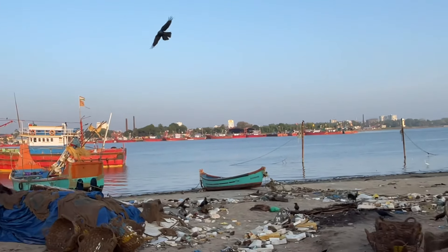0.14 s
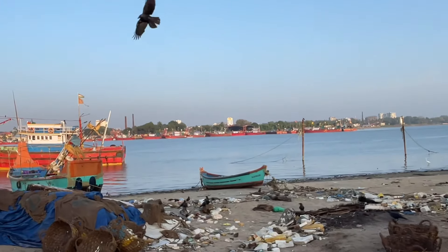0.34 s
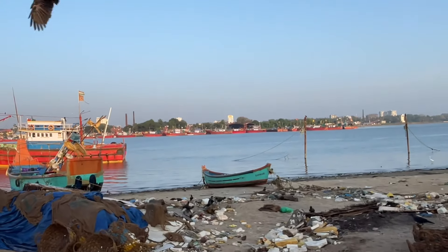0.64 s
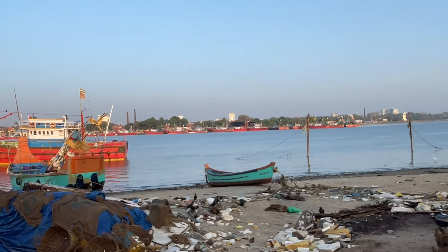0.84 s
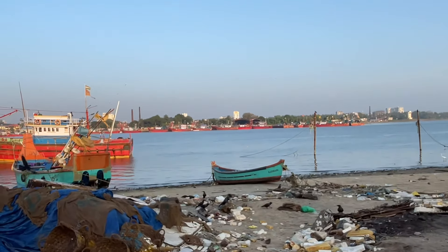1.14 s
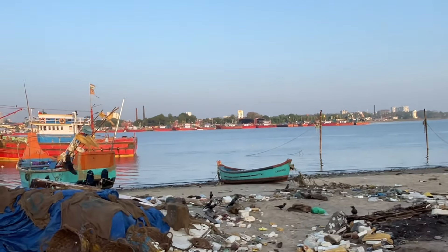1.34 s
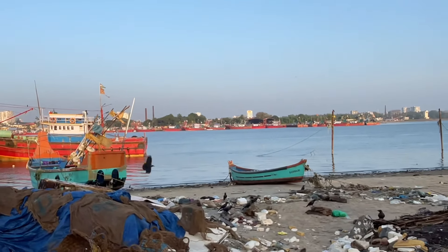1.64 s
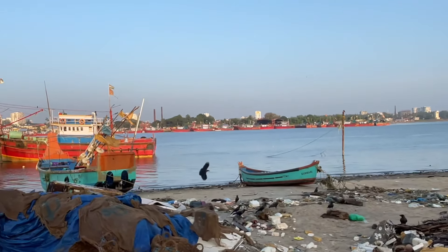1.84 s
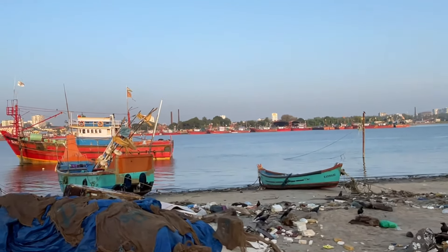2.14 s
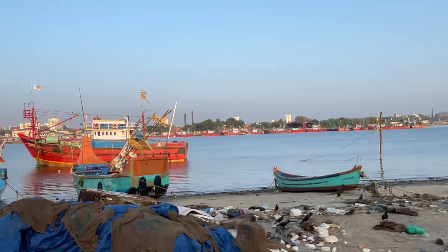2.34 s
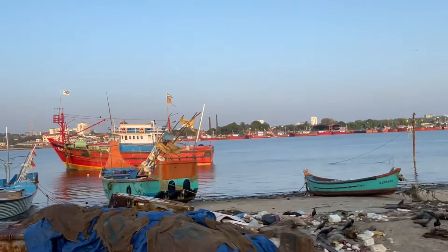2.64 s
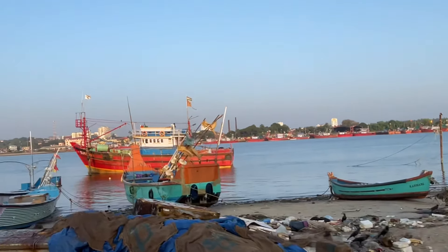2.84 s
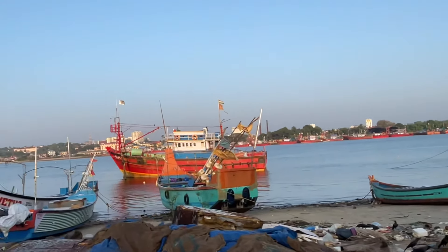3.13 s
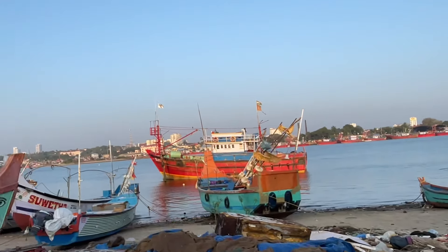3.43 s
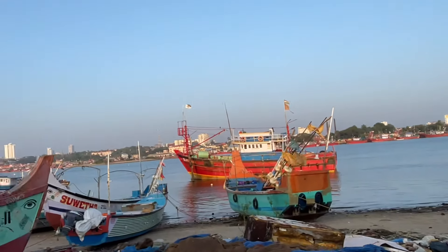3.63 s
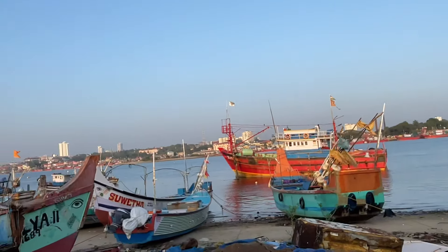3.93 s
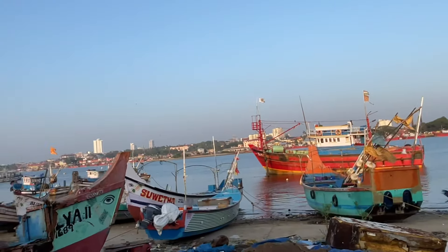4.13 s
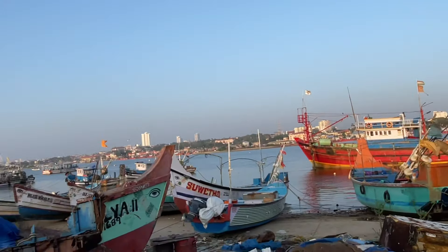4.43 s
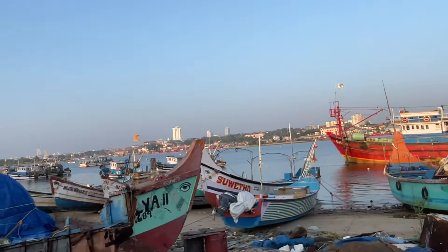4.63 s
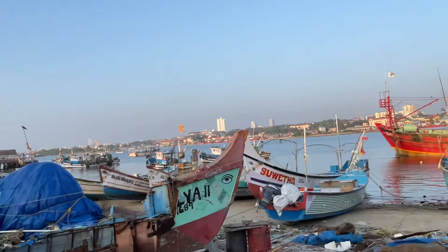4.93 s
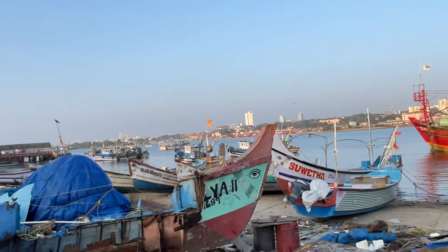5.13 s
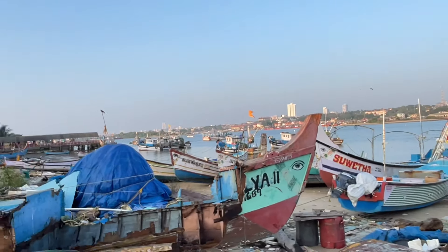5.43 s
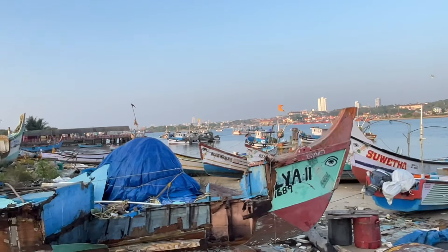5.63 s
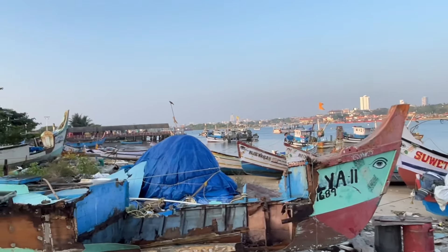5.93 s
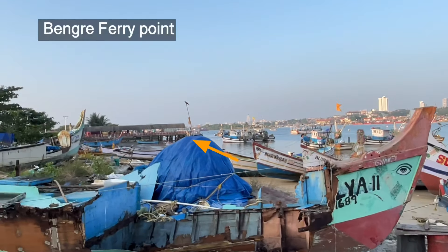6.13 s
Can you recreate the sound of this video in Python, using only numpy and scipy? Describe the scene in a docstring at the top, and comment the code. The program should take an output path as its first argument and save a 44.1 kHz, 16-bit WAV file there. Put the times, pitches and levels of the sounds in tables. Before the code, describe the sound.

Outdoors on a harbour beach, a handheld stereo microphone hears crows at varied distances. One caw is already under way at 0 s; others follow at about 0.15, 0.4, 0.55, 1.0, 1.2 and 1.6 s, raspy, fluttering, arching in pitch, some overlapping. From 1.9 to 2.4 s come a faint call, a deeper one and a strong near one. An idling boat engine wavers low throughout, with a faint motor hum and a low thump and knock around 2.7-2.8 s as breeze buffets the microphone. The loudest caws fall around 2.9 and 3.2 s, then a brighter one at 3.5, a short rough one at 3.8, and two overlapping at 4.2-4.4. Light knocks and ticks come near 4.7 s, with more breeze. A last higher, distant caw sounds at 5.0 s. Murmur and watery wash continue with a thin rattle, a tiny falling bird whistle at 5.85 and a tick at 6.05, until about 6.3 s.

```python
"""Crows caw, often overlapping, on a harbour beach, at several distances and bearings from a hand-held
camera that pans. Each caw is a train of fluttering syrinx pulses and breath, rung by a throat and scattered
by hulls and sand. Across the water a boat engine idles as wavering low tones, with low thumps near 2.7 s;
shaped noise makes the harbour's murmur and far wash, a thin rattle and the breeze buffeting the microphone.
Damped rings knock and tick nearby. Late on, a small bird whistles far off."""
import sys
import numpy as np
from scipy import signal
from scipy.fft import rfft, irfft, next_fast_len
from scipy.io import wavfile
from scipy.ndimage import uniform_filter1d, map_coordinates

SR = 44100
rng = np.random.default_rng(int(sys.argv[2]) if len(sys.argv) > 2 else 0)


def output_pcm(signal):
    """Save a mono or channel-first signal as 16-bit PCM at the path in sys.argv[1].

    Samples are clipped to [-1, 1] before scaling.
    """
    pcm = np.clip(np.atleast_2d(signal).T, -1, 1) * 32767
    wavfile.write(sys.argv[1], SR, np.round(pcm).astype(np.int16))


N = 276507

# One row per caw: (start [s], length [s], start to pitch crest [s], crest pitch [Hz],
# pitch bend [share/s^2], mid-call level at the crest pitch [dB], growth over the call [dB],
# treble over throat sound [dB], open-beak throat [Hz], open-beak upper throat [Hz], left lag [ms],
# left over right [dB], the same for the treble [dB], treble scatter [dB], bird [name])
CAW_CALLS = [ (-.19, 0.31, 0.14, 514, 8.3, -36.5, 4, -15, 2150, 4200, -0.045, -0.5, 0.5, -12, "near"),
             (0.151, 0.36, 0.2, 559.6, 8.7, -38.5, -1, -11.5, 2160, 4670, -0.06, -0.3, 3, -4, "shrill"),
             (0.38, 0.42, 0.23, 475.7, 3.07, -45, 10, -13, 1610, 4500, -0.048, 1, 2, -2.5, "faint"),
             (0.552, 0.32, .15, 515, 9.3, -38, 4.5, -15, 2090, 4300, -0.067, 0, 2, -9, "near"),
             (1.001, 0.35, 0.18, 488.6, 4.3, -45, 5.5, -10.5, 1610, 4060, .001, 2.5, 0, -6, "faint"),
             (1.171, .37, 0.19, 505, 5.85, -35.5, 5, -17, 2035, 4400, -.01, 2, 1, -7, "near"),
             (1.602, 0.31, 0.2, 484.6, 4.25, -39.5, 4, -13.5, 1844, 4250, 0.067, -1.5, 4.5, -13, "hoarse"),
             (1.922, 0.34, 0.11, 397.3, 1.11, -52, 25, -12, 1800, 5350, 0.096, 0.5, 2, 4, "faint"),
             (2.077, 0.42, 0.21, 442.3, 4.67, -38, 0.5, -14.5, 1780, 4400, .001, -1, .6, -15, "deep"),
             (2.397, 0.32, 0.14, 498.6, 7.7, -33.5, 1, -14, 1900, 4380, .001, -1, -0.5, -36, "near"),
             (2.925, 0.39, 0.2, 467.3, 6.5, -34, -1.5, -15.5, 1810, 4580, 0.11, -2, 2.5, 4, "deep"),
             (3.204, 0.327, .13, 475, 6, -32.5, -1, -17.5, 1910, 4330, 0.18, -1.5, 0.5, -7, "near"),
             (3.506, 0.31, .17, 571.6, 7.5, -34, -8, -13.5, 2260, 4600, 0.19, 2.6, 0, 2.5, "bright"),
             (3.803, 0.2, 0.084, 480, 5.7, -41.5, -16.5, -12, 1690, 3990, 0.26, -2.5, 1, -4, "rough"),
             (4.238, 0.28, 0.16, 498, 6.8, -39.5, 8, -9.5, 1350, 3900, 0.31, -1.5, 1, -11, "rough"),
             (4.363, 0.28, 0.13, 477.7, 6, -36.5, -1, -21, 2100, 4830, 0.37, -2.5, 2, -3.5, "far"),
             (5.031, 0.327, 0.15, 633.5, 8.8, -37, 2, -14, 2210, 4700, 0.38, -1.5, 1.5, -8, "distant"), ]
# Each bird's voice: (flutter at the start, before the creak [Hz], throat width [Hz], low tones [dB],
# chest [dB], dulling [dB/kHz], attack [ms], strength left in a flutter dip (sign ignored) [ratio],
# lean of a beat, under 1 rises fast and falls slowly [exponent],
# squareness of the pitch arch, 2 = parabola [exponent])
BIRD_VOICES = { "near": (76, 769, -10.5, -11.5, 3, 49, 0.67, 1.13, 2),
               "deep": (79, 772, -12.5, -10, 3, 31, 1, 1.23, 2),
               "shrill": (77, 620, -7, -29, 2.44, 26, 1.2, 1.2, 2),
               "bright": (78, 600, -7, -8, 2.5, 36, 1, 1, 1.56),
               "far": (77, 496, -8, -5, 3.5, 87, -1, 1.5, 1.5),
               "distant": (79, 607, -5.5, -2, 5.5, 24, 1.2, .65, 1),
               "hoarse": (87.5, 620, -13, -35, 3.05, 72, -1.3, 0.8, 1.5),
               "rough": (84, 800, -14, -5, 3.5, 31, -1, 1.1, 1.5),
               "faint": (89, 796, -41, -18, 2.1, 29, 19, 1.9, 2), }
# Noisy part of each voice with the beak wide: bird -> (share [0-1])
BREATH_SHARE = {"near": .025, "deep": .035, "shrill": .05, "bright": .08, "far": .015, "distant": .04,
                "hoarse": .025, "rough": .14, "faint": .2}
# Extra strength of the first upper throat tone: bird -> (gain [dB])
UPPER_RING_DB = {"near": -3, "deep": -6.5, "shrill": -4.5, "bright": -1, "far": -3.5, "distant": 0.5,
                 "hoarse": -2, "rough": -8, "faint": -4}
# Pitch lost at the bottom of a flutter dip: bird -> (share [0-1])
FLUTTER_SAG = {"near": .16, "deep": .38, "shrill": .24, "bright": .3, "far": .1, "distant": .24, "hoarse":
               .24, "rough": .25, "faint": .22}
# Extra raise of the second upper throat tone: bird -> (factor [ratio])
TONE_SPACING = {"near": 1.665, "deep": 1.475, "shrill": 1.265, "bright": 1.57, "far": 1.45, "distant": 1.27,
                "hoarse": 1.31, "rough": 1.61, "faint": 1.466}
# Upper throat resonances: (multiple of the upper throat tone [ratio], width [Hz], gain before dulling [dB]);
# the second multiple is raised further by each bird's spacing
THROAT_OVERTONES = [(0.998, 442, 4.5), (1, 920, -4), (1.9, 1340, -4.5), (2.5, 2640, 4)]
# Low tones of an idling engine, with low thumps near 2.7 s, before sway:
# (time [s], lower tone level [dB], octave level [dB])
LOW_TONE_LEVELS = [(0, -44, -47), (1.6, -41, -49), (2.3, -34, -67), (2.66, -37.5, -48), (2.73, -30, -45),
                   (2.79, -58, -36), (3.05, -112, -49), (4.2, -54, -42), (4.8, -42, -40.5),
                   (6.27, -44.5, -44.5)]
# Second, rising motor tone, before drift and sway: (time [s], pitch [Hz], level [dB])
MOTOR_TONE = [(0, 155, -49), (.9, 168.3, -49), (2.2, 173.3, -70), (2.6, 171.9, -59), (6.27, 173, -73)]
# Thin motor whine, before drift and sway: (pitch [Hz], level [dB])
MOTOR_WHINE = (376, -66.5)
# Breeze on the microphone, lifted by BREEZE_LIFT_DB: (time [s], level [dB])
BREEZE_LEVELS = [(0, -49), (1.5, -49), (2.76, -39.5), (3, -38.5), (3.35, -53), (3.7, -48.5), (3.9, -46.5),
                 (4.75, -42.5), (5, -47.5), (6.27, -47)]
# Harbour beds, before swell: (time [s], murmur level [dB], far wash level [dB], level of each rattle band [dB])
HARBOUR_LEVELS = [(0, -54.5, -55, -84), (1, -54.5, -58.5, -92), (2.8, -56, -56.5, -79),
                  (4.1, -52, -54, -74), (5.1, -53, -54, -76), (5.4, -53, -54.5, -64.5),
                  (6.27, -54.5, -54.5, -62.5)]
# Relative spectra of the breeze, the murmur and the far wash: (frequency [Hz], gain [dB])
BREEZE_SPECTRUM = [(24, -41), (35, -5), (48, 1.5), (71, -1.5), (102, 0.5), (138, -6), (226, -22),
                   (320, -59), (700, -120)]
MURMUR_SPECTRUM = [(150, -50), (220, 2), (400, 2), (800, -2), (1400, -34)]
WASH_SPECTRUM = [(500, -31), (900, 6.5), (1600, 6.5), (2400, 3.5), (3200, -5), (3700, -8), (5000, -10),
                 (8000, -21.5), (11000, -80), (14000, -66)]
# How alike the two ports hear the murmur: (frequency [Hz], likeness [-1 to 1])
MURMUR_LIKENESS = [(230, 0.68), (890, 0.067)]
# Flickering narrow bands: (centre [Hz], width [Hz], relative level [dB])
RATTLE_BANDS = [(1620, 150, 0), (2720, 150, -2), (3060, 170, 0)]
# Dull knocks nearby, then faint ticks: (time [s], starting level [dB], pitch [Hz])
DULL_KNOCKS = [(2.786, -24.5, 170), (4.675, -37, 660), (4.784, -37, 410)]
FAINT_TICKS = [(1.61, -46, 2950), (4.64, -47, 2820), (4.767, -52, 4870), (4.802, -54, 5300),
               (6.045, -40.5, 2970)]
# Far small bird, before wavering: (start [s], length [s], from [Hz], to [Hz], level [dB])
FAR_CHIRPS = [(5.846, 0.079, 3800, 3110, -60)]

# Microphone ports: above PORT_HZ the left port always hears later by a fixed time
PORT_HZ, PORT_MS = 6000, 0.181
TOP_HZ = 13800  # upper limit of the finished sound
# Pitch arch: all arches meet the parabola SHOULDER_S from the crest; the bend is greater after it
SHOULDER_S, FALL_STEEPER = 0.15, 1.25
# Call strength: share at the onset, closing fade, level lost per unit share of pitch under the crest
ONSET_SHARE, RELEASE_S, EFFORT_DB = 0.15, 0.055, 29.5
FLUTTER_SLOWS_HZ_PER_S, CREAK_S = 11.42, 0.08
PUSH_LEAN = 0.9  # under 1, the strength peaks before mid-beat
# The first upper tone sounds mostly near the top of each beat; its noisy part
RING_GATE, RING_NOISE = 2.2, 0.36
GAPE_STEPS = 5  # beak openings from shut to wide
AIR_SCATTER_DB = -6  # echoes of the highest treble
BREEZE_LIFT_DB = 4.5


def amp(db):
    """Amplitude factor of a level in dB."""
    return 10 ** (np.asarray(db) / 20)


def unit(x):
    """x scaled to an rms of 1."""
    return x / np.sqrt(np.mean(x ** 2) + 1e-20)


def along(points, hz):
    """(Hz, value) points read on a log frequency axis."""
    f, v = np.transpose(points)
    return np.interp(np.log(hz + 1), np.log(f + 1), v)


def curves(rows):
    """One value per sample for each column after the time."""
    s, *cols = np.transpose(rows)
    return [np.interp(np.arange(N) / SR, s, c) for c in cols]


def wobble(rate, count=N):
    """A smooth random curve, rate knots a second."""
    knots = rng.standard_normal(int(count * rate / SR) + 4)
    return map_coordinates(knots, [np.arange(count) * rate / SR])


def filtered(x, response):
    """x through a complex response of frequency."""
    n = x.shape[-1]
    m = next_fast_len(n + 8192)
    return irfft(rfft(x, m) * response(np.fft.rfftfreq(m, 1 / SR)), m)[..., :n]


def mode(f, hz, width_hz):
    """A causal resonance of peak gain 1."""
    return 1j * f * width_hz / (hz * hz - f * f + 1j * f * width_hz)


def highpass(f, hz, order):
    """Gain that falls away below hz."""
    return 1 / (1 + (hz / (f + 1)) ** order)


def ports(f, lag_ms):
    """Left and right responses: the bass lag tells the bearing, the treble lag is the housing's."""
    def late(ms):
        return np.exp(-2j * np.pi * f * ms / 1000)

    high = highpass(f, PORT_HZ, 12)
    left = (1 - high) * late(lag_ms) + high * late(PORT_MS)
    return np.array([left, np.ones_like(f)])


def scattered(voice, scatter_db):
    """Hulls and sand scatter a short, different tail of the treble to each port."""
    t = np.arange(SR // 5) / SR
    echoes = rng.standard_normal((2, len(t))) * amp(-60 * t / 0.1)
    echoes = echoes / np.linalg.norm(echoes[0])
    wet = signal.fftconvolve(voice, echoes, axes=1)[:, :voice.shape[1]]
    # (frequency [Hz], gain [dB])
    spectrum = [(2600, -18), (3600, scatter_db), (6500, scatter_db), (8000, AIR_SCATTER_DB)]
    return filtered(wet, lambda f: amp(along(spectrum, f)))


def caw(start, length, crest, crest_hz, bend, db, growth_db, treble_db, throat_hz, upper_hz, lag_ms,
        pan_db, treble_pan_db, scatter_db, flutter_hz, width_hz, low_db, chest_db, dulling_db,
        attack_ms, dip, lean, squareness, breathy, ring_db, sag, spacing):
    """Syrinx pulses whose pitch and strength sag at each beat of a slower flutter, through the throat."""
    count = round(length * SR) + SR // 6
    age = np.arange(count) / SR

    # the slow pitch arch and the call's strength
    droop = bend * SHOULDER_S ** 2 * np.abs((age - crest) / SHOULDER_S) ** squareness
    droop = np.clip(droop * np.where(age > crest, FALL_STEEPER, 1), 0, 1 / 2)
    pitch = crest_hz * (1 - droop)
    rise = np.clip(age * 1000 / attack_ms, 0, 1)
    gate = (ONSET_SHARE + (1 - ONSET_SHARE) * rise) * np.clip((length - age) / RELEASE_S, 0, 1)
    level = gate * amp(db + growth_db * (age / length - 1 / 2) - EFFORT_DB * droop)

    # the beak opens as the pitch rises; the voice is more ragged while it is less open
    gape = np.clip((pitch / pitch.max() - 0.8) / 0.2, 0, 1)
    breathy = np.clip(breathy + 0.14 * (1 - gape), 0, 1)

    # flutter: the voice starts as slower, more separate beats
    creak = np.clip(1 - age / CREAK_S, 0, 1)
    unsteady = 1 - creak / 4 + (0.012 + 0.1 * breathy) * wobble(40, count)
    beat = np.cumsum((flutter_hz - FLUTTER_SLOWS_HZ_PER_S * age) * unsteady) / SR
    taut = np.sin(np.pi * (beat % 1) ** np.clip(lean, 1 / 4, 2))  # round tops, sharp dips
    push = np.sin(np.pi * (beat % 1) ** (PUSH_LEAN * (1 - creak / 2))) ** 2
    flicker = amp((0.67 + 6.4 * breathy) * wobble(60.4, count))
    chop = unit((abs(dip) * (1 - creak) + push) * flicker)

    # syrinx: the overtones' phases are spread, so pulses are not spikes
    fluttered = pitch * (1 - sag * (1 - taut) + 0.069 * breathy * wobble(198.5, count))
    cycle = 2 * np.pi * np.cumsum(fluttered) / SR
    pulses = unit(sum(np.cos(k * cycle + 0.6 * k * k) for k in range(2, 28)))
    breath = unit(rng.standard_normal(count) * (1 + 0.17 * np.cos(cycle)))
    source = chop * (np.sqrt(1 - breathy) * pulses + np.sqrt(breathy) * breath)

    def main(f):
        throat = mode(f, throat_hz, width_hz) ** 2
        low = amp(low_db) * mode(f, 0.59 * throat_hz, 157)
        chest = amp(chest_db) * mode(f, 736, 296) ** 2
        shelf = amp(-8.0) + 1 / (1 + (f / 2580) ** 20)
        return (throat - low + chest) * shelf * highpass(f, 650, 8)

    def tone(f, i):
        multiple, tone_width_hz, tone_db = THROAT_OVERTONES[i]
        hz = multiple * upper_hz * (spacing if i == 1 else 1)
        gain = (-1) ** i * amp(tone_db - dulling_db * f / 1000)
        return gain * mode(f, hz, tone_width_hz) * highpass(f, 3300, 8)

    def upper(f):
        ring = amp(ring_db) * tone(f, 0) * mode(f, upper_hz, 700)
        return [ring, tone(f, 1), tone(f, 2) + tone(f, 3)]

    # filter at each beak opening, then blend by how near the beak is to each: tones climb as it opens
    steps = np.linspace(0, 1, GAPE_STEPS)
    share = np.clip(1 - abs(gape - steps[:, None]) * (GAPE_STEPS - 1), 0, 1)
    bursts = unit(taut ** RING_GATE + 1.35 * breathy) * unit(pulses + (RING_NOISE + 3 * breathy) * breath)
    drives = np.array([bursts, source + 1.33 * breath, chop ** 0.73 * breath])
    tones = filtered(drives, lambda f: np.array([upper((1 + 0.069 * (1 - g)) * f) for g in steps]))
    rasp = unit((share * tones.sum(axis=1)).sum(axis=0))
    throat = filtered(source, lambda f: np.array([main((1 + 0.088 * (1 - g)) * f) for g in steps]))
    body = unit((share * throat).sum(axis=0))

    # bearing and distance
    body_gain = amp(np.outer([1, -1], [pan_db / 2]))
    rasp_gain = amp(treble_db + np.outer([1, -1], [treble_pan_db / 2]))
    voice = level * (body_gain * body + rasp_gain * rasp)
    return filtered(voice, lambda f: ports(f, lag_ms)) + scattered(voice, scatter_db)


def crows():
    """Every bird's caw at its moment, on its bearing."""
    out = np.zeros((2, N + 2 * SR))  # a spare second at each end
    for *call, bird in CAW_CALLS:
        sound = caw(*call, *BIRD_VOICES[bird], BREATH_SHARE[bird], UPPER_RING_DB[bird],
                    FLUTTER_SAG[bird], TONE_SPACING[bird])
        start = round(call[0] * SR) + SR
        out[:, start:start + sound.shape[1]] += sound
    return out[:, SR:SR + N]


def engines():
    """Idling engine, low thumps and a rising motor: sine tones that waver in pitch and level."""
    def tone(hz, db, sway_db, drift):
        level = amp(db + sway_db * wobble(19.0))
        return level * np.sin(2 * np.pi * np.cumsum(hz * (1 + drift * wobble(12))) / SR)

    lower_db, octave_db = curves(LOW_TONE_LEVELS)
    motor_hz, motor_db = curves(MOTOR_TONE)
    low_tones = tone(65.3, lower_db, 2, 0.04) + tone(130.5, octave_db, 2.5, 0.025)
    motor = tone(motor_hz, motor_db, 0.2, 0.0078) + tone(*MOTOR_WHINE, 2.1, 0.0054)
    return low_tones + motor


def rush(spectrum, alike, patchy_db):
    """Stereo noise of rms 1 with patches of random gain; mid and side set how alike the ports are."""
    z = signal.stft(rng.standard_normal((2, N)), nperseg=512)[2]
    field = rng.standard_normal(z.shape[1:])
    field = uniform_filter1d(uniform_filter1d(field, 6, 0), 14, 1)
    pair = signal.istft(z * amp(patchy_db * unit(field)), nperseg=512)[1][:, :N]

    def response(hz):
        turn = np.arccos(np.clip(along(alike, hz), -1, 1)) / 2
        return amp(along(spectrum, hz)) * [np.cos(turn), np.sin(turn)]

    mid, side = filtered(pair, response)
    return unit(np.array([mid + side, mid - side]))


def breeze():
    """Wind buffets the microphone: lumpy low noise."""
    lumps = amp(1.5 * wobble(12))
    noise = rush(BREEZE_SPECTRUM, [(30, 0.75)], patchy_db=2.0)
    return amp(curves(BREEZE_LEVELS)[0] + BREEZE_LIFT_DB) * unit(lumps * noise)


def rattling():
    """Narrow bands of noise flicker unevenly, about 38 times a second."""
    def blips():
        turns = np.cumsum(38 * amp(5 * wobble(20))) / SR
        return (0.6 + np.cos(np.pi * turns) ** 2) * amp(2.5 * wobble(5))

    out = np.zeros(N)
    for hz, width_hz, db in RATTLE_BANDS:
        band = filtered(rng.standard_normal(N), lambda f: mode(f, hz, width_hz) ** 2)
        out += amp(db) * unit(blips() * band)
    return out


def harbour():
    """A mid murmur, a far wash of water and town, and a thin rattle, all as shaped noise."""
    murmur_db, wash_db, rattle_db = curves(HARBOUR_LEVELS)
    murmur_level = amp(murmur_db + 0.55 * wobble(5.4))
    murmur = murmur_level * rush(MURMUR_SPECTRUM, MURMUR_LIKENESS, patchy_db=1.5)
    swell = amp(0.8 * wobble(4))
    likeness = [(1000, 0.6), (6000, 0.7), (13000, 0.7)]  # (frequency [Hz], likeness [-1 to 1])
    wash = amp(wash_db) * swell * rush(WASH_SPECTRUM, likeness, patchy_db=1.2)
    return murmur + filtered(wash + amp(rattle_db) * rattling(), lambda f: ports(f, 0))


def taps(rows, t60):
    """Nearby knocks or ticks: sine rings that die by 60 dB in t60 seconds."""
    out, t = np.zeros(N), np.arange(SR // 10) / SR
    for s, db, hz in rows:
        ring = amp(db - 60 * t / t60) * np.sin(2 * np.pi * hz * t)
        out[round(s * SR):][:len(t)] += ring
    return out


def chirps():
    """A far small bird: a soft whistle that falls raggedly in pitch."""
    out = np.zeros(N)
    for s, length, from_hz, to_hz, db in FAR_CHIRPS:
        u = np.arange(round(length * SR)) / (length * SR)
        level = amp(db + 4.5 * wobble(120, len(u))) * np.sin(np.pi * u)
        hz = from_hz + (to_hz - from_hz) * u + 260 * wobble(250, len(u))
        out[round(s * SR):][:len(u)] += level * np.sin(2 * np.pi * np.cumsum(hz) / SR)
    return out


def scene():
    """The beach as heard at the two ports, the engines a little to the right."""
    water = amp([[-0.4], [0.4]]) * engines()
    nearby = taps(FAINT_TICKS, t60=0.014) + taps(DULL_KNOCKS, t60=0.039)
    return crows() + water + breeze() + harbour() + nearby + chirps()


def record(dry):
    """The finished sound holds nothing above TOP_HZ."""
    return filtered(dry, lambda hz: hz < TOP_HZ)


dry = scene()
out = record(dry)
output_pcm(out)
```